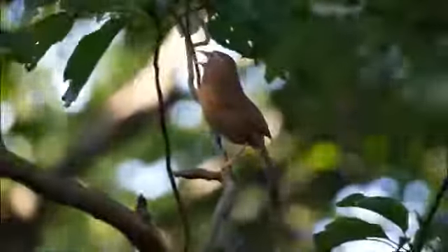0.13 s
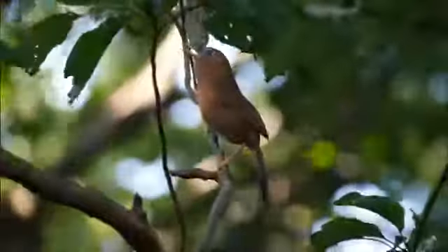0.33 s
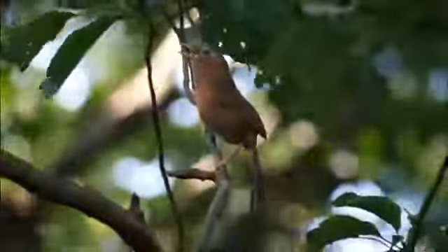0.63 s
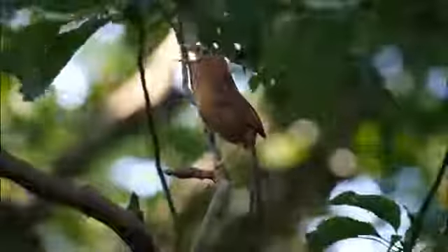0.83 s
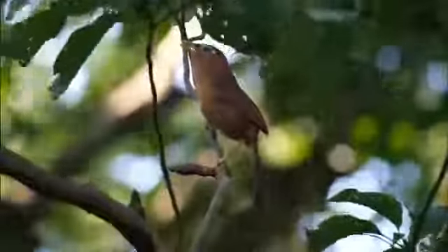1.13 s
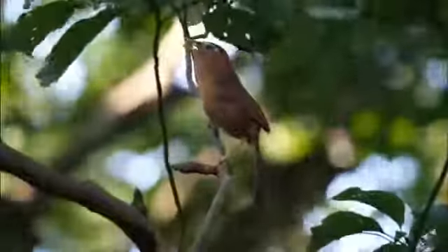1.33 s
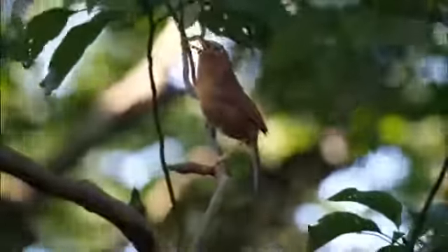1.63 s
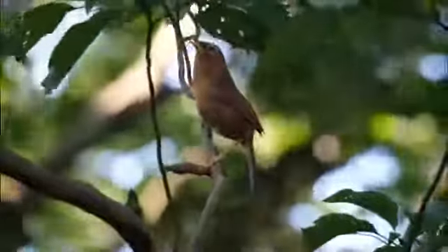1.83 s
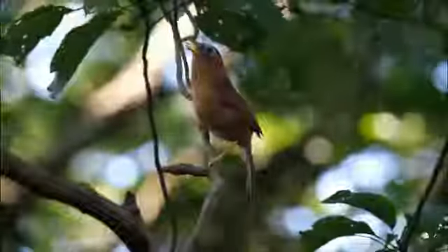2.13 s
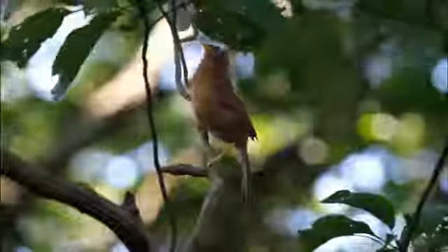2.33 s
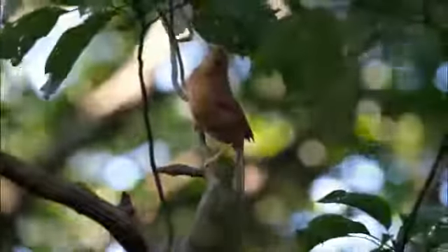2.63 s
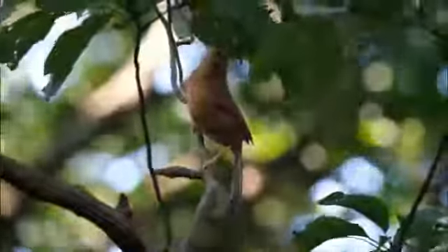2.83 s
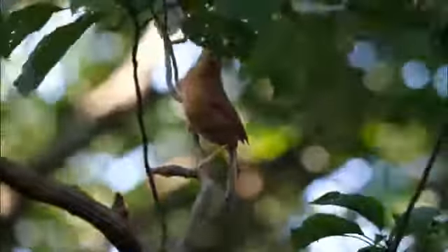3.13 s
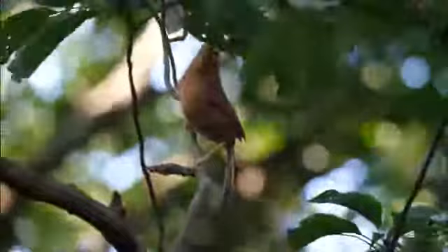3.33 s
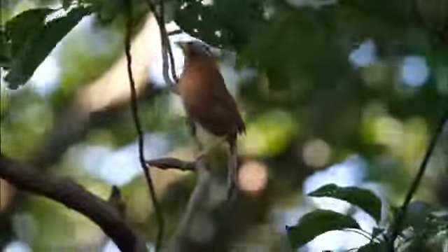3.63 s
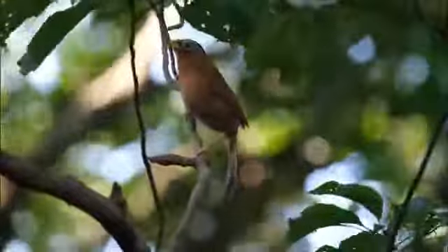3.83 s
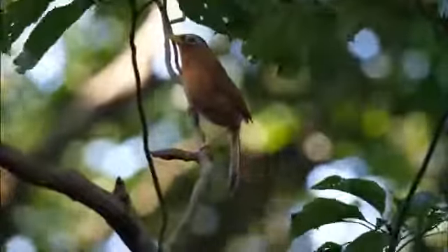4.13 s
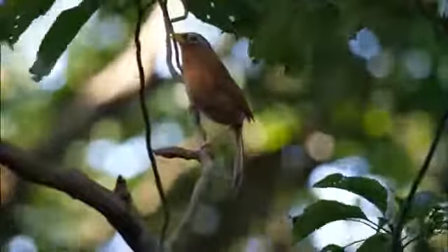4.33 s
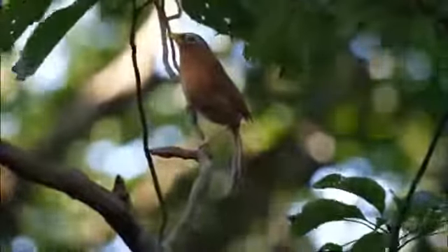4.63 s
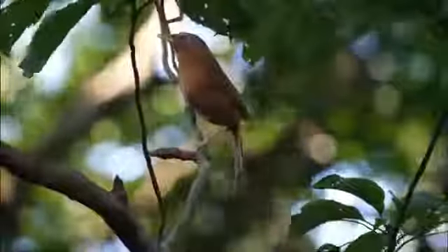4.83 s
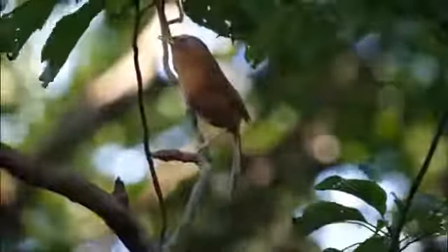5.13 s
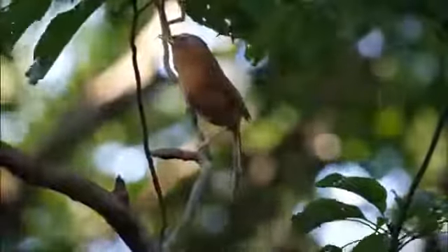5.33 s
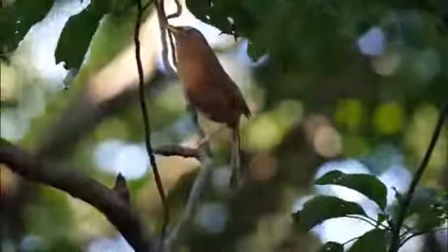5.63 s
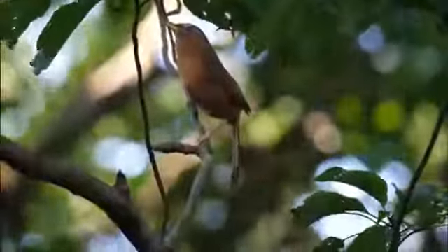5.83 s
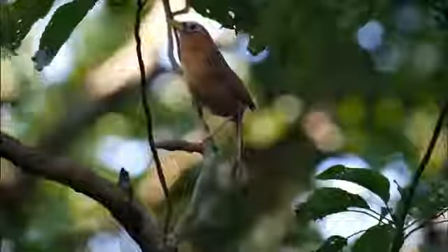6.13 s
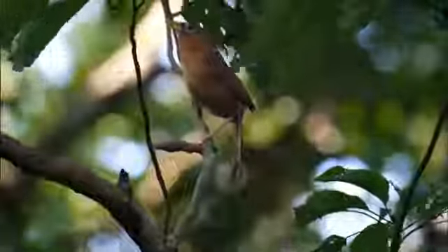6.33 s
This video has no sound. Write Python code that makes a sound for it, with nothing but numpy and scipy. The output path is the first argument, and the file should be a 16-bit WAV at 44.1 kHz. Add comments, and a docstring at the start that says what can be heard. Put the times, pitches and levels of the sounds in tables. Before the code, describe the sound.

Under trees, a songbird close by pours out loud, clear whistles, plunging slurs and harsh fluttering buzzes for about three seconds, its notes ringing briefly among the trunks. A high cicada hiss runs throughout. A distant crow caws hoarsely five times, slightly left. Later the bird gives only small soft chips, and one hard, tiny tick snaps right by the microphone.

```python
"""From the start cicadas drone (banded noise) over a faint rumble and hush, a lower buzz fading out by 2.6 s.
0-3.2 s: a songbird whistles slurs and buzzes (fluttering near-pure tones), two voices overlapping at times.
1.1-6 s: a distant crow caws five times (hoarse harmonics); from 2.3 s a thin insect whine comes and goes.
From 4 s the bird gives soft chips; at 4.87 s a sharp tick close to the microphone makes the recorder's
limiter duck for a moment. Trees scatter bird, crow and tick."""
import sys
import numpy as np
from scipy import signal
from scipy.fft import rfft, irfft, next_fast_len
from scipy.io import wavfile
from scipy.ndimage import uniform_filter1d, minimum_filter1d, map_coordinates

SR = 44100
rng = np.random.default_rng(int(sys.argv[2]) if len(sys.argv) > 2 else 0)


def transcribe(signal):
    """Save signal, clipped to [-1, 1], as a 16-bit WAV file at the path in sys.argv[1]."""
    frames = np.atleast_2d(signal).T
    limited = np.clip(frames, -1, 1)
    pcm = np.round(limited * 32767).astype(np.int16)
    wavfile.write(sys.argv[1], SR, pcm)


N = 286209


def amp(db):
    """Decibels to gain."""
    return 10 ** (np.asarray(db) / 20)


def unit(x):
    """Scale to rms 1."""
    return x / np.sqrt(np.mean(x ** 2) + 1e-20)


def blend(a, b, share):
    """From a at share 0 to b at share 1."""
    return a + (b - a) * share


def along(points, hz):
    """Read (frequency [Hz], value) points on a log frequency axis."""
    f, v = np.transpose(points)
    return np.interp(np.log(hz + 1), np.log(f), v)


def curves(rows, t):
    """Each column after the first, read at t."""
    s, *cols = np.transpose(rows)
    return [np.interp(t, s, c) for c in cols]


def wobble(rate_hz, size):
    """Smooth random curve, rate_hz knots a second."""
    knots = rng.standard_normal(int(size * rate_hz / SR) + 4)
    return map_coordinates(knots, [np.arange(size) * rate_hz / SR])


def filtered(x, response):
    """Multiply the spectrum of x by a function of frequency."""
    m = next_fast_len(N + SR // 2)
    return irfft(rfft(x, m) * response(np.fft.rfftfreq(m, 1 / SR)), m)[..., :N]


def pan(left_db):
    """Gains of the two channels for a left-minus-right level."""
    return unit(amp([[left_db / 2], [-left_db / 2]]))


def place(x, left_db, left_lag_ms):
    """A source off to one side reaches the two microphones at different levels and times."""
    sides = np.array([[-1], [1]])
    return pan(left_db) * filtered(x, lambda hz: np.exp(np.pi * 1j * hz * left_lag_ms / 10 ** 3 * sides))


def mix_pair(mid, side, correlation):
    """Two channels of the given correlation from two independent noises."""
    turn = np.arccos(np.clip(correlation, -1, 1)) / 2
    return np.cos(turn) * mid + np.sin(turn) * np.array([side, -side])


def noise_pair(correlation):
    """Two white noises with the given correlation."""
    mid, side = rng.standard_normal((2, N))
    return mix_pair(mid, side, correlation)


def band_noise(spectrum, correlation):
    """Coloured stereo noise of rms 1."""
    return unit(filtered(noise_pair(correlation), lambda hz: amp(along(spectrum, hz))))


def note(rows, fade_s):
    """Sample numbers, smoothed pitch, amplitude and any further columns of one note."""
    start, end = rows[0][0], rows[-1][0]
    span = np.arange(max(0, int((start - fade_s / 2) * SR)), min(N, int((end + fade_s) * SR)))
    t = span / SR
    hz, db, *others = curves(rows, t)
    gate = np.clip(np.minimum(t - start + fade_s / 2, end + fade_s - t) / fade_s, 0, 1)
    level = amp(db) * np.sin(gate * np.pi / 2) ** 2
    return span, uniform_filter1d(hz, size=300, mode="nearest"), level, *others


# scatter from the trees: (frequency [Hz], decay t60 [s])
TREE_T60 = [(300, 0.91), (1200, 0.31), (2200, 0.37), (3500, 0.22), (10000, 0.028)]
DIFFUSE_LAG_S = 0.045 / 230  # sets how far up the scatter stays alike in both channels


def trees(x, build_s, gap_s):
    """Scatter from trunks and leaves: starts after a gap, builds up, dies soonest in the high treble."""
    hz, t, z = signal.stft(rng.standard_normal((2, SR)), SR, nperseg=256)
    # sound from all around is alike at both microphones in the bass only
    z = mix_pair(z[0], z[1], np.sinc(2 * hz * DIFFUSE_LAG_S)[:, None])
    decay = amp(-60 * t / along(TREE_T60, hz)[:, None])
    tail = signal.istft(z * decay * (1 - np.exp(-t / build_s)), SR, nperseg=256)[1]
    # offset the extra energy of long-ringing frequencies
    tail = filtered(tail, lambda f: along(TREE_T60, f) ** -.5)[:, :SR]
    tail /= np.linalg.norm(tail, axis=1, keepdims=True)
    delayed = np.pad(x, (int(abs(gap_s) * SR), 0))
    return signal.fftconvolve(delayed[None], tail, axes=1)[:, :N]


# leaves throw back more high notes than low: (frequency [Hz], gain [dB])
LEAF_SCATTER = [(1500, -1), (2300, -2.5), (3200, 1), (4200, 1)]


def songbird():
    """Loud phrases and soft chips from a perch a little to the right, plus tree scatter."""
    phrases = [rasp(*row) for row in RASPS] + [slide(*row) for row in SLIDES] + [slur(*row) for row in SLURS]
    kinds = [(HIGH_CHIP, HIGH_CHIPS), (LOW_CHIP, LOW_CHIPS), (FALLING_CHIP, FALLING_CHIPS)]
    calls = [chip(shape, *row) for shape, rows in kinds for row in rows]
    song = whistle(phrases, flutter_hz=116.42, flutter_db=-0.18, second_db=-58, third_db=-40)
    chips = whistle(calls, flutter_hz=134.7, flutter_db=4, second_db=-50, third_db=-94)
    direct = amp(-1.0) * place(song, left_db=-3.5, left_lag_ms=0.061)
    direct = direct + amp(-1) * place(chips, left_db=-5, left_lag_ms=0.069)
    to_trees = amp(-7.0) * song + amp(-8) * chips
    scattered = filtered(to_trees, lambda hz: amp(along(LEAF_SCATTER, hz)))
    return direct + trees(scattered, build_s=0.0029, gap_s=0.0027)


def whistle(notes, flutter_hz, flutter_db, second_db, third_db):
    """The syrinx gives a nearly pure tone; a fast, uneven flutter of its pitch turns it into a buzz."""
    out = np.zeros(N)
    for rows in notes:
        span, hz, level, swing_hz = note(rows, fade_s=0.0083)
        size = len(span)
        cycle = 2 * np.pi * np.cumsum(flutter_hz * (1 + 0.3424 * wobble(120, size))) / SR
        flutter = unit(np.sin(cycle) + 0.33 * wobble(420, size))
        phase = 2 * np.pi * np.cumsum(hz + swing_hz * flutter) / SR
        tone = np.sin(phase) + amp(second_db) * np.sin(2 * phase) + amp(third_db) * np.sin(3 * phase)
        out[span] += np.sqrt(2) * level * amp(flutter_db * wobble(86.5, size)) * tone
    return out


ATTACK_DB = 28.5  # rasps and slides swell in from this far down


def swell_db(t, swell_s):
    """Soft start: level climbs linearly in dB."""
    return -ATTACK_DB * np.maximum(1 - t / swell_s, 0)


# harsh falling buzzes, some overlapping; levels before the mix gain:
# (time [s], length [s], swell [s], start pitch [Hz], end pitch [Hz], bend [1 = straight, more = falls late],
#  start level [dB], end level [dB], start flutter [Hz rms], end flutter [Hz rms])
RASPS = [ (0, 0.18, 0.00085, 3337, 3202, 0.62, -17.5, -21, 85, 30),
         (0, 0.13, 0.0011, 3700, 3458, 1, -28.5, -26, 280, 192),
         (.08, 0.17, 0.04, 3900, 3350, 1.7, -38, -30.5, 104, 80),
         (.18, 0.21, 0.013, 3170, 2780, 2.2, -26, -25.5, 70, 80),
         (.245, 0.11, 0.019, 3330, 3164, 2.73, -21.5, -28, 70, 35.4),
         (1.355, 0.19, 0.024, 4260, 3475, 2, -38.5, -30, 140, 130),
         (1.358, .11, 0.033, 3680, 3456, .7, -27, -23.5, 100, 89),
         (1.425, 0.19, 0.032, 3350, 3182, 1.8, -25, -26, 85, 45),
         (1.595, 0.12, 0.051, 3400, 3054, 2.2, -29, -20, 110, 75), ]


def rasp(start, length, swell, start_hz, end_hz, bend, start_db, end_db, start_flutter, end_flutter):
    """Buzz falling in pitch as its flutter changes; rows of (time [s], Hz, dB, flutter [Hz])."""
    u = np.linspace(0, 1, 100)
    hz = blend(start_hz, end_hz, u ** bend)
    db = blend(start_db, end_db, u) + swell_db(length * u, swell)
    return np.transpose([start + length * u, hz, db, blend(start_flutter, end_flutter, u)])


# whistles that slide from one pitch to a second and droop at the end; levels before the mix gain:
# (time [s], length [s], swell [s], mid-slide after start [s], slide time [s],
#  first pitch [Hz], second pitch [Hz], droop [Hz], first level [dB], second level [dB],
#  first flutter [Hz rms], second flutter [Hz rms])
SLIDES = [ (0.552, 0.21, 0.028, 0.054, 0.013, 2391, 2460, 28, -27, -42.5, 79, 6.8),
          (0.84, 0.21, 0.055, 0.053, 0.032, 2206, 4027, 167, -10, -30.5, 196, 63),
          (1.458, 0.11, .025, .04, 0.018, 2370, 2467, 2, -46.5, -46.5, 4, 3.4),
          (1.602, 0.19, .015, 0.077, .022, 2460, 3106, 380, -41, -23, 5.3, 60),
          (2.058, 0.293, 0.048, .186, 0.017, 2136, 2660, 18, -28, -36, 83, 3.1),
          (2.665, 0.3, 0.04, 0.22, 0.021, 2075, 2710, 3.5, -29.5, -33, 76, 2.4), ]
DROOP_S = 0.046  # time constant of the droop


def slide(start, length, swell, middle, slide_s, first_hz, second_hz, droop_hz, first_db, second_db,
          first_flutter, second_flutter):
    """One S-shaped move carries pitch, level and flutter from the first tone to the second."""
    t = np.linspace(0, length, 100)
    moved = 1 / (1 + np.exp((middle - t) / slide_s))
    hz = blend(first_hz, second_hz, moved) - droop_hz * np.exp((t - length) / DROOP_S)
    db = blend(first_db, second_db, moved) + swell_db(t, swell)
    flutter = blend(first_flutter, second_flutter, moved) * np.minimum(.5 + t / swell / 2, 1)
    return np.transpose([start + t, hz, db, flutter])


# slurs that plunge, then recover a little or a lot; levels before the mix gain:
# (time [s], length [s], hold before plunge [s], plunge time [s], top [Hz], bottom [Hz], end [Hz],
#  last lift [Hz], plunge level [dB], bottom level [dB], end level [dB])
SLURS = [ (0.268, 0.19, 0.003, 0.023, 2826, 2032, 2367, 24, -38.5, -40.5, -25.5),
         (1.099, 0.25, 0.031, 0.026, 3040, 1853, 2345, 6.7, -26, -30, -25.5),
         (1.8, 0.13, 0.0011, 0.027, 2686, 1633, 1680, 2, -35, -53.5, -43),
         (2.395, 0.18, 0.001, .026, 2350, 1586, 1587, 57, -32.5, -40.5, -45.5),
         (3.018, 0.178, 0.004, 0.025, 2432, 1553, 1554, 91, -29.5, -37.5, -40.5), ]
SLUR_FLUTTER_HZ, SETTLED_FLUTTER_HZ = 22, 11  # rms, at the top and once fallen
BOTTOM_PLUNGES = 2.45  # plunge times from the hold to the bottom
RECOVER_S, LIFT_S = 0.062, .022  # time constants
START_DROP_DB_PER_HOLD_S = 501.5  # the longer the hold, the softer the start


def slur(start, length, hold, plunge, top_hz, bottom_hz, end_hz, lift_hz, plunge_db, bottom_db, end_db):
    """Pitch plunges, rounds out at the bottom, eases up and lifts a little as the note closes."""
    t = np.linspace(0, length, 100)
    bottom = hold + BOTTOM_PLUNGES * plunge
    high = 1 / (1 + (np.maximum(t - hold, 0) / plunge) ** 3.1)
    recovered = 1 - np.exp(-(np.maximum(t - bottom, 0) / RECOVER_S) ** 1.5)
    hz = blend(blend(bottom_hz, end_hz, recovered), top_hz, high)
    hz += lift_hz * np.exp((t - length) / LIFT_S)
    start_db = plunge_db - START_DROP_DB_PER_HOLD_S * hold
    db = np.interp(t, [0, hold + plunge, bottom, length], [start_db, plunge_db, bottom_db, end_db])
    return np.transpose([start + t, hz, db, blend(SETTLED_FLUTTER_HZ, SLUR_FLUTTER_HZ, high)])


# soft chips, high ones that flick up and turn over, short low ones that rise, longer ones that fall:
# (time [s], length [s], reference pitch [Hz], reference level [dB])
HIGH_CHIPS = [(3.955, 0.039, 2570, -49.5), (4.372, 0.046, 2622, -43.5), (4.578, 0.043, 2800, -42.5),
              (4.811, 0.063, 2780, -44.5), (5.083, 0.0516, 2880, -55), (5.446, 0.068, 2590, -56.5),
              (5.897, 0.092, 2587, -45.5)]
LOW_CHIPS = [(5.109, 0.028, 1764, -44), (5.495, 0.02, 1710, -45.5), (5.962, 0.012, 1810, -38.5),
             (6.474, 0.029, 1930, -55)]
FALLING_CHIPS = [(5.188, .042, 1926, -53), (5.561, 0.056, 1736, -45.5), (6.03, 0.051, 1670, -37),
                 (6.289, 0.076, 2765, -38.5)]
# shape of each kind: (share of length [0-1], pitch [ratio], relative level [dB], flutter [Hz rms])
HIGH_CHIP = [(0, .89, -18, 60), (.38, .95, -8, 95), (.62, 1.04, -4.5, 130), (.8, 1.01, -7, 120),
             (1, 1, -12, 90)]
LOW_CHIP = [(0, .84, -10, 35), (.35, .98, 0, 30), (.7, 1.08, -2, 25), (1, 1.06, -11, 25)]
FALLING_CHIP = [(0, 1.17, -13, 22), (.25, 1.055, -2.5, 20), (.55, .97, -1.5, 16), (.8, .93, -3, 14),
                (1, .93, -9, 14)]


def chip(shape, start, length, hz, db):
    """A shared shape set to one chip's time, length, pitch and level."""
    u = np.linspace(0, 1, 100)
    ratio, shape_db, flutter_hz = curves(shape, u)
    return np.transpose([start + length * u, hz * ratio, db + shape_db, flutter_hz])


# throat response with the beak narrow and wide open: (frequency [Hz], relative level [dB])
THROAT_NARROW = [(280, -57.5), (580, -42.5), (870, -7), (1160, 8.5), (1450, -16.5), (1750, -22),
                 (2050, -20), (2600, -42)]
THROAT_OPEN = [(280, -58.5), (580, -39.5), (830, -14.5), (1100, 3.5), (1400, 9), (1700, 6), (2030, -16),
               (2600, -47.5)]
THROAT_EDGE_HZ = 1885  # the throat passes little above this
CAW_GRIT = .18  # unsteady strength all through a caw
DOUBLING = 16  # strong/weak cycle difference per unit of hoarseness


def crow():
    """Harmonics through a throat that changes as the beak moves; pitch sags and the voice turns hoarse."""
    out = np.zeros(N)
    for row in CAWS:
        span, hz, level, hoarse, opening = note(caw(*row), fade_s=.02)
        size = len(span)
        phase = 2 * np.pi * np.cumsum(hz * (1 + hoarse * wobble(199.5, size))) / SR
        k = np.arange(1, 10)[:, None]
        throat_db = blend(along(THROAT_NARROW, k * hz), along(THROAT_OPEN, k * hz), opening)
        # paths through the trees interfere: each harmonic swells and fades on its own
        fading_db = 2.65 * np.array([wobble(25.2, size) for _ in k])
        strength = amp(throat_db + fading_db)
        voice = np.sum(strength * np.sin(k * phase), axis=0) / np.linalg.norm(strength, axis=0)
        # rasp: strength shakes, and strong and weak cycles alternate
        shake = 1 + (CAW_GRIT + 9 * hoarse) * wobble(420, size) + DOUBLING * hoarse * np.sin(phase / 2)
        out[span] += np.sqrt(2) * level * shake * voice
    out = filtered(out, lambda hz: 1 / (1 + (hz / THROAT_EDGE_HZ) ** 12))
    near = amp(-4) * trees(out, build_s=0.02, gap_s=.01)
    far_echo = amp(-12.5) * trees(out, build_s=0.0053, gap_s=0.073)
    direct = amp(4.0) * place(out, left_db=-7.0, left_lag_ms=0.14)
    return direct + (near + far_echo) * pan(left_db=0.0)


# caws, levels before shake, throat edge and mix gain: (time [s], length [s], crest after start [s],
#  top pitch [Hz], first level [dB], level once the beak has moved [dB], end level [dB],
#  beak moves after start [s], opening before [0-1], opening after [0-1])
CAWS = [(1.066, 0.21, 0.045, 290.5, -40.5, -44.5, -44, 0.081, 0.1, 0.51),
        (2.037, 0.27, 0.054, 265.2, -41, -40, -49.5, 0.1, 0.91, 0.72),
        (2.948, 0.29, 0.094, 288, -42.5, -41, -42.5, 0.13, 0.88, 0.58),
        (3.968, 0.24, .054, 294.2, -41.5, -39.5, -40.5, 0.083, 0.28, 0.78),
        (5.705, .25, 0.071, 294.5, -41, -37.5, -46.5, 0.077, 0.46, 0.83)]
CAW_RISE, CAW_SAG, CAW_BEND = .05, .21, 1.6  # shares of the top pitch; how late the sag comes
CAW_ATTACK_DB, CAW_ATTACK_S = 11.5, 0.038
CLEAN, HOARSE = .005, .04  # pitch jitter share up to the crest and at the end
BEAK_S = 0.0042  # how quickly the beak moves


def caw(start, length, crest, top_hz, first_db, open_db, end_db, opens, before, after):
    """Flat pitch arch, beak move, hoarse sag; rows of (time [s], Hz, dB, hoarseness, opening)."""
    t = np.linspace(0, length, 100)
    rising = np.maximum(1 - t / crest, 0)
    falling = np.maximum(t - crest, 0) / (length - crest)
    hz = top_hz * (1 - CAW_RISE * rising ** 2 - CAW_SAG * falling ** CAW_BEND)
    moved = 1 / (1 + np.exp((opens - t) / BEAK_S))
    later_db = np.interp(t, [opens, length], [open_db, end_db])
    db = blend(first_db, later_db, moved) - CAW_ATTACK_DB * np.maximum(1 - t / CAW_ATTACK_S, 0)
    hoarse = blend(CLEAN, HOARSE, falling ** 3)
    return np.transpose([start + t, hz, db, hoarse, np.clip(blend(before, after, moved), 0, 1)])


# the tick: (time [s], direct peak level before limiting [dB])
TICKS = [(4.8745, 2.7)]
# what it rings with: (frequency [Hz], relative level [dB], decay t60 [s])
TICK_MODES = [(1300, -23, .005), (2850, -12, .007), (3350, -11, .006), (3850, -9, .005), (8100, -15, .003),
              (10000, -11, .002), (12100, -3, .002), (14500, -1, .003)]
TICK_LAG_S = .000024  # reaches the left microphone first, by this much


def tick():
    """Tiny hard contact beside the microphone: modes hold for 0.7 ms, then ring out within milliseconds."""
    out, t = np.zeros((2, N)), np.arange(SR // 50) / SR
    ringing_s = np.maximum(t - .0007, 0)
    phase_s = t - .0005 + TICK_LAG_S * np.array([[.5], [-.5]])
    for s, db in TICKS:
        ring = sum(amp(level - 60 * ringing_s / t60) * np.sin(2 * np.pi * hz * phase_s)
                   for hz, level, t60 in TICK_MODES)
        ring *= np.minimum(t / .0003, 1)  # attack
        out[:, round(s * SR):][:, :len(t)] += amp(db) * ring / np.abs(ring).max()
    near = amp(-22) * trees(out[0], build_s=.03, gap_s=.003)
    far_echo = amp(-26) * trees(out[0], build_s=.03, gap_s=.055)
    return out + near + far_echo


# drone level, dipping early on where the recorder ducks under the loud bird, later nearly steady;
# before throb and trim: (time [s], level [dB], upper band level [dB])
DRONE_EARLY = [(0.0, -56.5, -64), (0.28, -51.5, -73.5), (0.39, -54, -80.5), (0.53, -47, -74),
               (0.65, -41, -67), (0.75, -45.5, -71), (1.04, -42, -64), (1.3, -46.5, -74.5),
               (1.42, -46, -60.5), (1.6, -61.5, -81.5), (1.75, -52.5, -87.5), (1.84, -56, -88.5),
               (1.94, -45, -72.5), (2.08, -37.5, -65), (2.24, -46.5, -71), (2.43, -44.5, -72),
               (2.58, -38.5, -55.5), (2.71, -37, -54.5), (3.0, -42.5, -62.5), (3.38, -37.5, -60.5),
               (3.68, -39, -57), (3.98, -41, -64), (4.18, -41.5, -62.5), (4.42, -41, -62),
               (4.72, -41, -64.5), (4.85, -41.5, -55.5)]
DRONE_LATER = [(5.12, -41, -56.5), (5.19, -38.5, -61.5), (5.334, -39, -60.5), (5.69, -41, -64),
               (6.45, -43, -64)]
# lower buzz that dies away, before flicker and trim: (time [s], level [dB])
BUZZ = [(0.05, -61), (0.35, -71.5), (0.5, -58.5), (0.71, -53), (1.27, -55), (1.51, -64), (1.8, -68.5),
        (2.12, -54.5), (2.25, -67), (2.41, -62.5), (2.6, -99)]
# resonances, sinking overall: (time [s], centre [Hz], relative width [ratio])
DRONE_CENTRE = [(0, 8800, 0.81), (1, 8630, 0.93), (2.102, 8590, 0.93), (2.698, 8635, 0.96),
                (3.5, 8360, 1.044), (4.7, 8154, 1.13), (5.3, 8096, 0.9), (6.49, 8100, 1.005)]
BUZZ_CENTRE = [(0, 6058, 0.77), (1.3, 5984, 0.94), (1.9, 5708, 0.86), (2.15, 5396, 0.75), (2.4, 5685, 0.42)]
# spectra: (frequency [Hz], relative density [dB per Hz]); drone and buzz are then shifted and stretched
DRONE_BAND = [(3000, -41.5), (4300, -40.5), (5300, -37.5), (6200, -19), (7000, -10), (7600, 1.5), (8150, 6),
              (8700, 1), (9400, -7), (10200, -15), (11200, -44.5), (13000, -42), (15500, -59.5)]
UPPER_BAND = [(6000, -69.5), (9500, -42), (11000, 1), (12000, -5), (13000, 5.5), (14200, -1.5),
              (14900, -13), (15400, -37.5)]
BUZZ_BAND = [(4000, -52), (4700, -27), (5300, -10.5), (5750, -3), (6100, 1.5), (6500, -5.5), (7200, -34),
             (8500, -46)]
TYMBAL_HZ, TYMBAL_DEPTH = 436, 0.11  # the nearest cicada's pulses show faintly in the drone


def cicadas():
    """Many tymbals blur into a hiss around one sinking resonance, with a weaker band above and a lower buzz."""
    t = np.arange(N) / SR
    drone_db, upper_db = curves(np.vstack([DRONE_EARLY, DRONE_LATER]), t)
    drone = sliding(DRONE_BAND, DRONE_CENTRE, correlation=.02)
    throb_db = .95 * wobble(25, N) + .5 * wobble(110, N)
    pulse_phase = 2 * np.pi * np.cumsum(TYMBAL_HZ * (1 + 0.00501 * wobble(11, N))) / SR
    pulses = 1 + TYMBAL_DEPTH * np.sin(pulse_phase)
    main = amp(drone_db + throb_db + 3.5) * pulses * drone * pan(left_db=2.5)
    upper_noise = band_noise(UPPER_BAND, correlation=0.027)
    upper = amp(upper_db + throb_db + 5.0) * upper_noise * pan(left_db=1.5)
    buzz_db, = curves(BUZZ, t)
    buzz_level = amp(buzz_db + wobble(39.92, N) + 4.0)
    buzz = buzz_level * sliding(BUZZ_BAND, BUZZ_CENTRE, correlation=0.0598) * pan(left_db=0.5)
    return main + upper + buzz


GRAIN_DB = 2.2  # rms; fine random unevenness of level over time and pitch


def sliding(band, path, correlation):
    """Stereo noise of rms 1 whose band slides with its centre and stretches about its top."""
    hz, frames, z = signal.stft(noise_pair(correlation), SR, nperseg=512)
    centre, width = curves(path, frames)
    top_hz = max(band, key=lambda point: point[1])[0]
    body = amp(along(band, np.maximum(top_hz + (hz[:, None] - centre) / width, 0)))
    grain = unit(uniform_filter1d(rng.standard_normal(z.shape[1:]), size=5, axis=1))
    return unit(signal.istft(z * body * amp(GRAIN_DB * grain), SR, nperseg=512)[1][:, :N])


# faint whine, before flicker: (time [s], level [dB])
WHINE = [(2.3, -94.5), (2.7, -75.5), (3.25, -83.5), (3.6, -64.5), (3.95, -73.5), (4.35, -74), (4.7, -63),
         (4.87, -59), (5.1, -72.5), (5.33, -76), (5.5, -79.5), (5.7, -63.5), (6, -81.5), (6.3, -64.5)]
# its spectrum: (frequency [Hz], relative density [dB per Hz])
WHINE_BAND = [(3600, -40.5), (3950, -4), (4200, 2), (4650, 1), (4880, -6), (5100, -34.5)]
WHINE_PATCHY_DB = 3.5  # rms; random unevenness of level over time and pitch


def whine():
    """Distant insects sing in one narrow band whose level varies at random over time and pitch."""
    db, = curves(WHINE, np.arange(N) / SR)
    z = signal.stft(band_noise(WHINE_BAND, correlation=.3), nperseg=1024)[2]
    patches = uniform_filter1d(rng.standard_normal(z.shape[1:]), size=4, axis=0)
    patches = unit(uniform_filter1d(patches, size=8, axis=1))
    chorus = signal.istft(z * amp(WHINE_PATCHY_DB * patches), nperseg=1024)[1][:, :N]
    return amp(db + 1.5 * wobble(25, N)) * unit(chorus)


# low rumble and hush of the wood, before sway and trim: (time [s], level [dB])
RUMBLE = [(0.05, -73.5), (0.73, -72.5), (0.77, -65.5), (1.23, -74), (1.86, -76.5), (1.92, -69), (2.01, -74),
          (2.09, -57.5), (2.35, -72.5), (2.42, -63), (2.45, -70), (2.94, -68), (2.97, -76.5), (3.49, -66.5),
          (4.01, -57.5), (4.05, -67), (4.3, -70.5), (4.8, -68), (4.84, -71.5), (5.83, -69), (5.95, -76.5),
          (6.49, -69)]
HUSH = [(0.05, -84), (0.52, -80.5), (1.12, -72), (1.25, -68.5), (1.45, -82), (1.75, -81.5), (2.26, -68),
        (3.1, -70), (3.31, -67.5), (3.62, -72), (4.05, -71.5), (4.73, -78.5), (4.84, -77), (5.14, -72.5),
        (5.32, -75.5), (5.65, -74), (5.79, -66), (6.49, -81)]
# their spectra: (frequency [Hz], relative density [dB per Hz])
RUMBLE_BAND = [(20, -10), (60, 0), (110, -5), (200, -8), (400, -13.5), (1200, -58.5)]
HUSH_BAND = [(60, -21.5), (250, 7), (600, 11.5), (1200, 10.5), (2000, 1.5), (2900, -41), (4300, -20.5),
             (5300, -19.5), (9000, -29), (15500, -41.5)]


def air():
    """Faint rumble under the hush of the wood: two coloured noises, alike in both channels."""
    t = np.arange(N) / SR
    (rumble_db,), (hush_db,) = curves(RUMBLE, t), curves(HUSH, t)
    sway_db = 1.5 * wobble(9, N)
    rumble = amp(rumble_db + sway_db + 1.0) * band_noise(RUMBLE_BAND, correlation=1.0)
    hush = amp(hush_db + 7.0) * band_noise(HUSH_BAND, correlation=1.0)
    return rumble + hush


def scene():
    """Everything heard under the canopy."""
    return songbird() + crow() + tick() + cicadas() + whine() + air()


def limiter(x, ceiling_db, hold_s, release_db_per_s, overshoot):
    """Gain drops at once on a peak; a slower stage pulls it further down before it climbs back."""
    peak_db = 20 * np.log10(np.abs(x).max(axis=0) + 1e-9)
    over_db = np.maximum(peak_db - ceiling_db, 0)
    size = int(hold_s * SR) | 1
    held_db = -minimum_filter1d(-over_db, size, origin=size // 2)
    ramp_db = release_db_per_s * np.arange(N) / SR
    fast_db = np.maximum.accumulate(held_db + ramp_db) - ramp_db
    slow_db = overshoot * uniform_filter1d(held_db, size, origin=size // 2)
    cut_db = np.maximum(fast_db, slow_db)
    # a short look-ahead rounds the attack
    return x * amp(uniform_filter1d(minimum_filter1d(-cut_db, size=41), size=41))


TOP_HZ = 16500


def record(dry):
    """The recorder limits peaks and keeps nothing above its band limit."""
    limited = limiter(dry, ceiling_db=-6.5, hold_s=.078, release_db_per_s=45, overshoot=1.7)
    return filtered(limited, lambda hz: hz < TOP_HZ)


dry = scene()
out = record(dry)
transcribe(out)
```